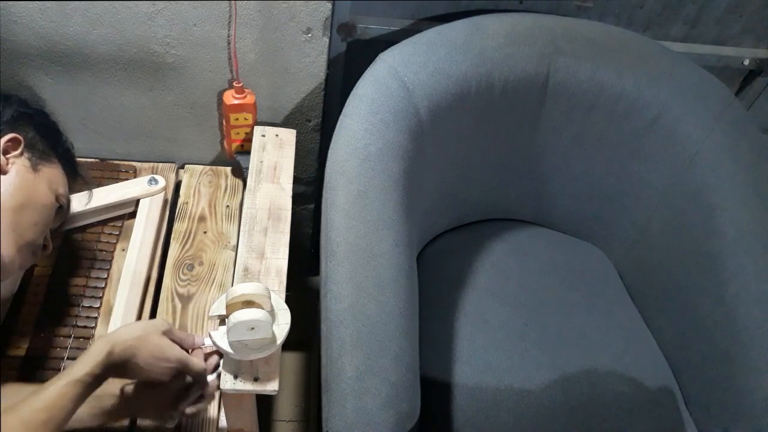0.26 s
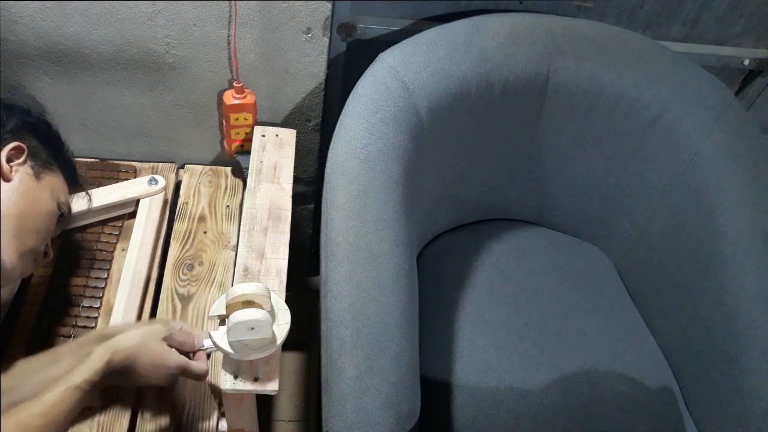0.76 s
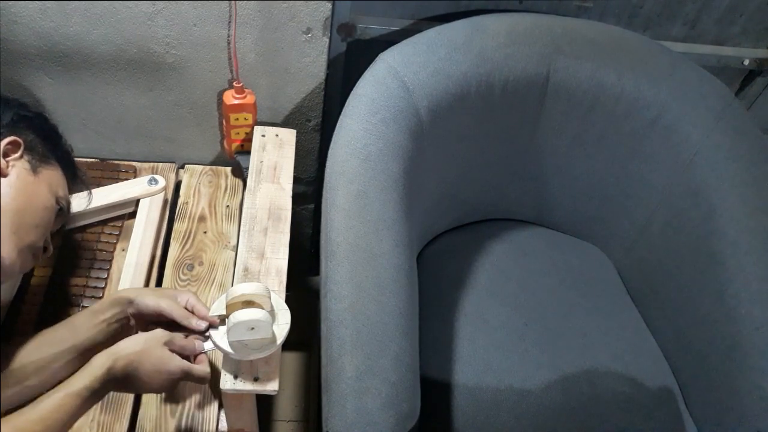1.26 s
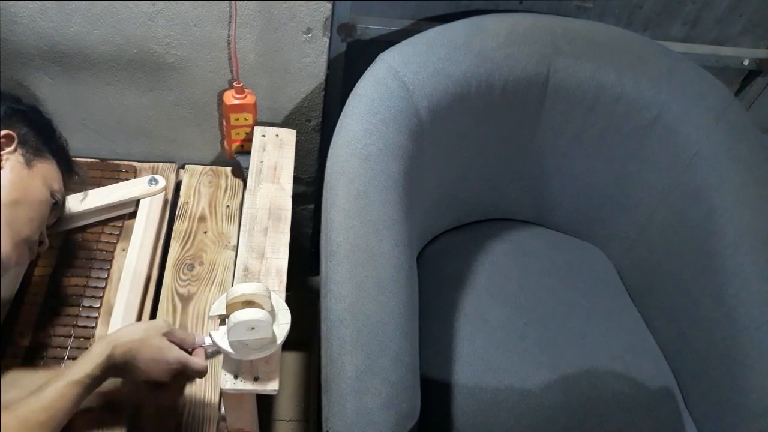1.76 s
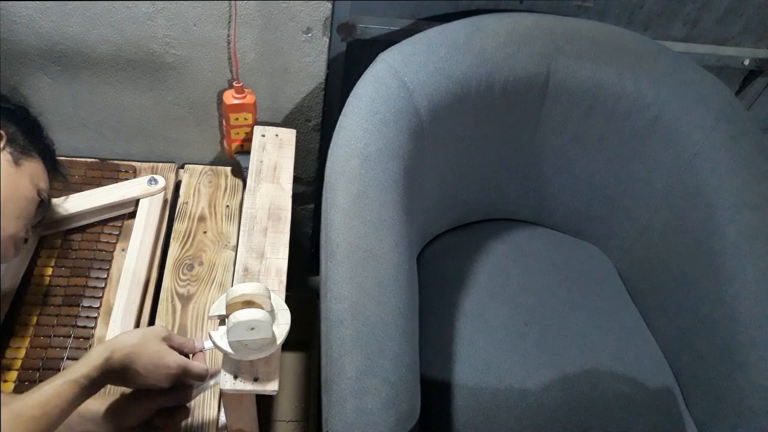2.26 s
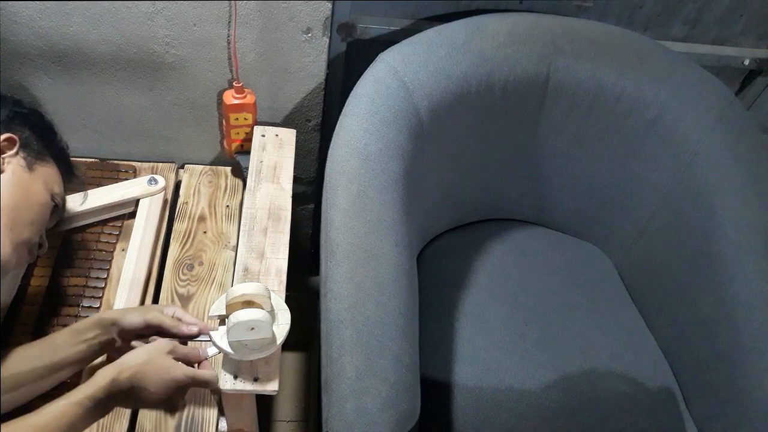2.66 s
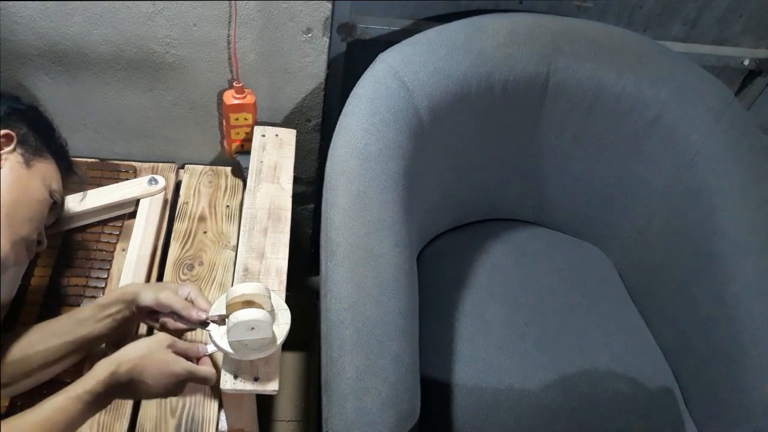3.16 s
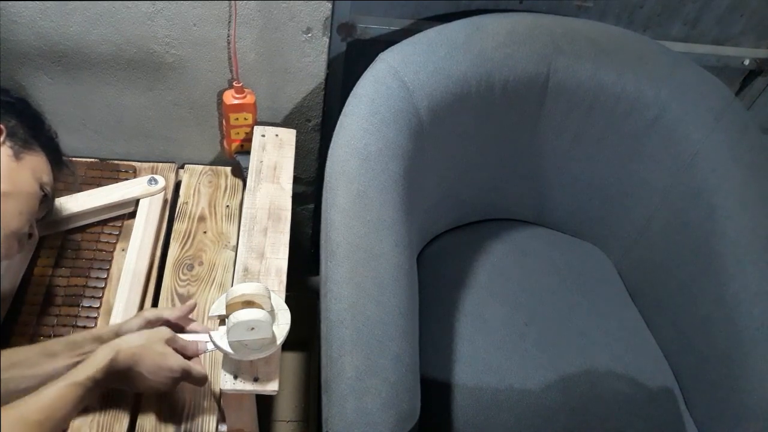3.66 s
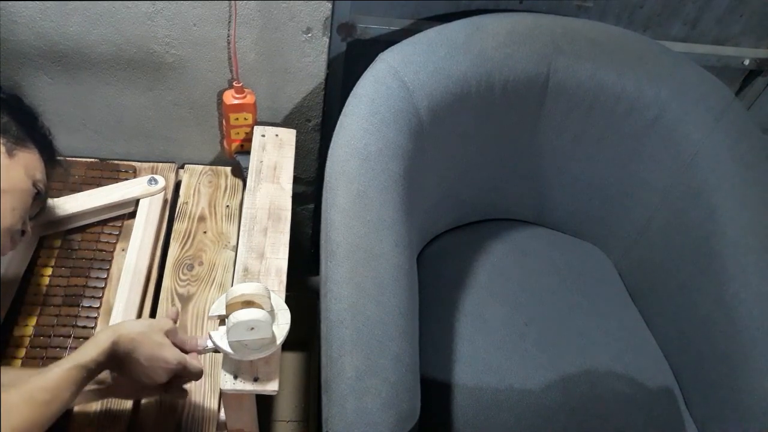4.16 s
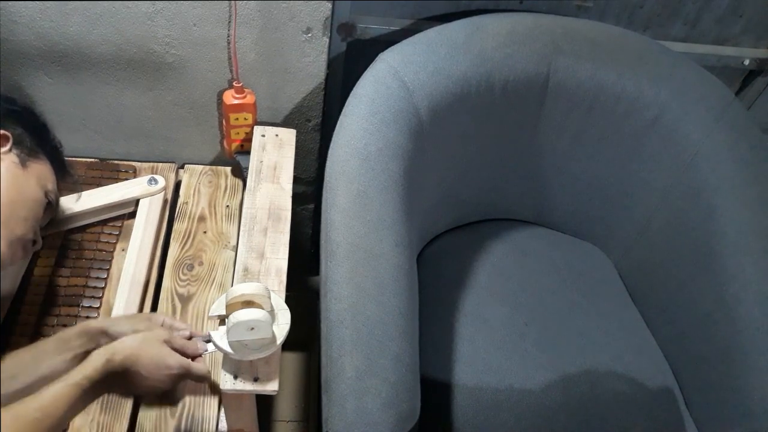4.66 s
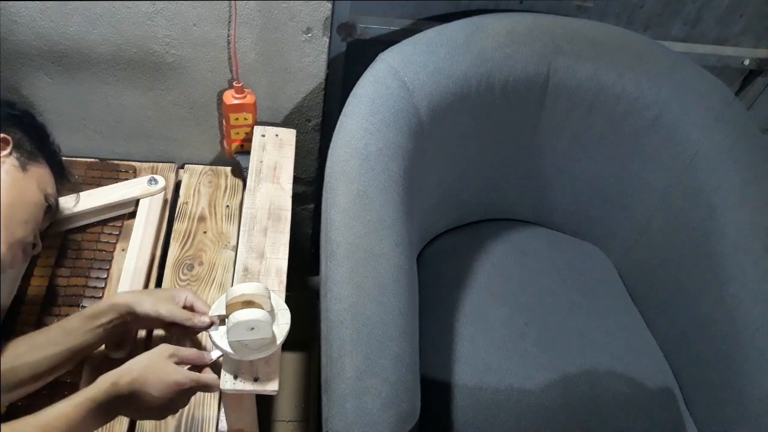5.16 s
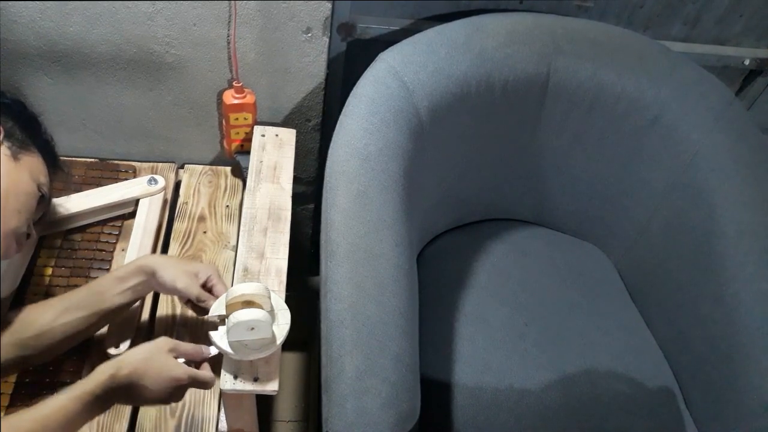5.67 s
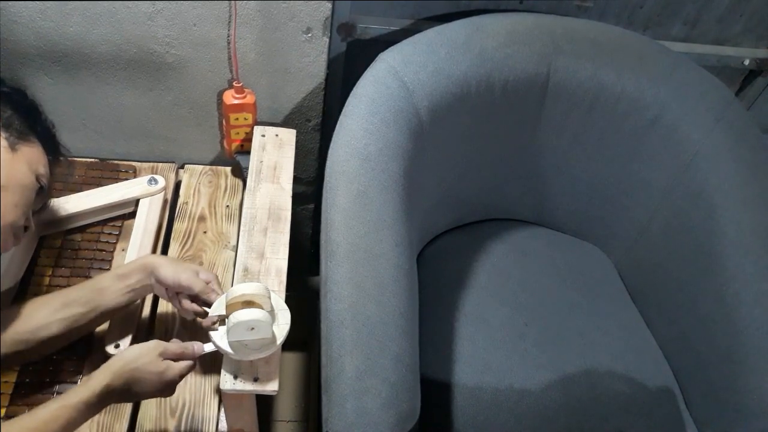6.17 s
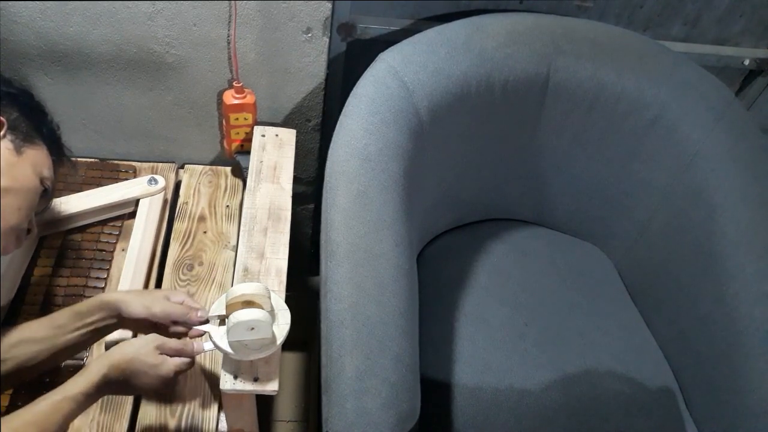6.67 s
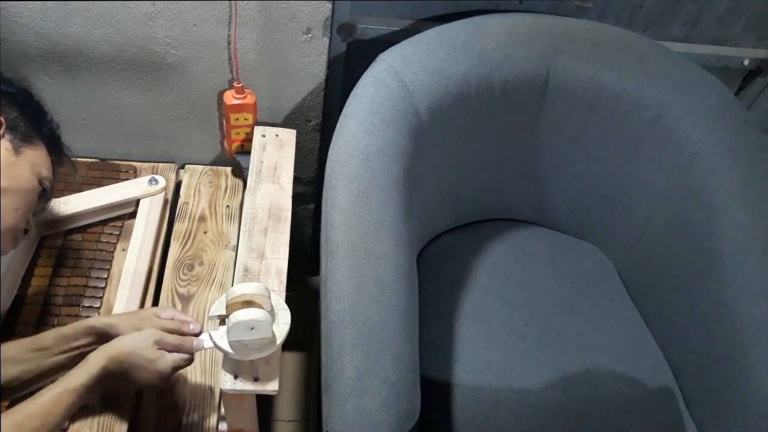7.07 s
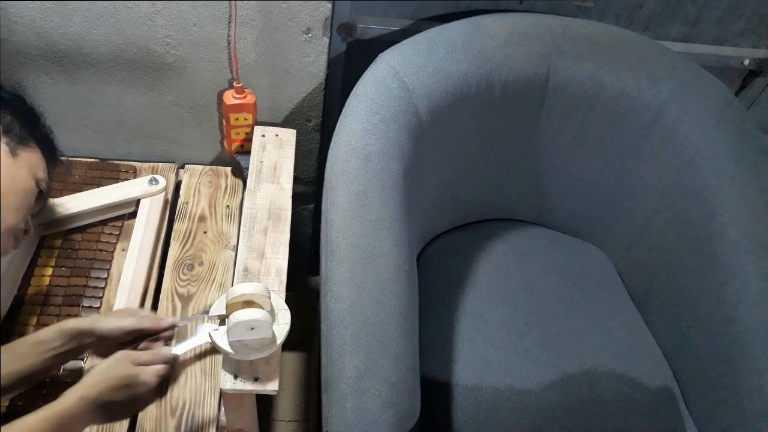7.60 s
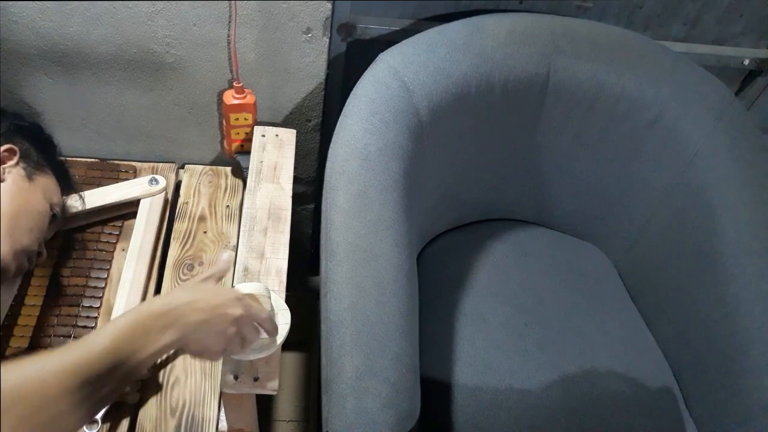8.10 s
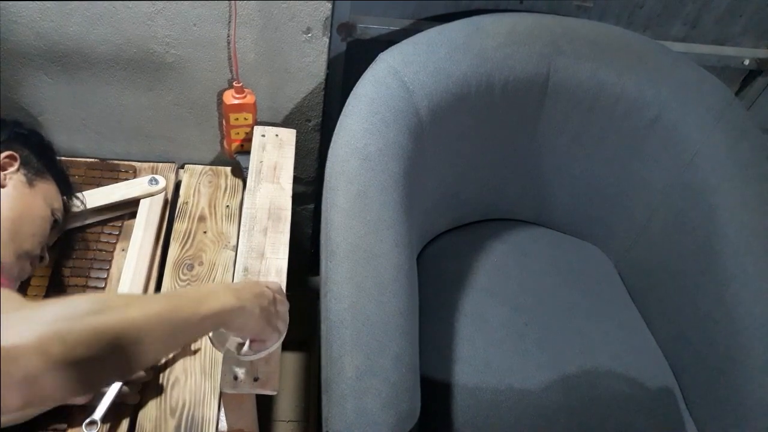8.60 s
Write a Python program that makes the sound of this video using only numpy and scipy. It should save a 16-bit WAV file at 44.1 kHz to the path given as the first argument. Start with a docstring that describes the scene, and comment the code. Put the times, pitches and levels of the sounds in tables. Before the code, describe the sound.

A close microphone hears wrenches working a bolt in a wooden frame inside a small, hard-walled shed. Faint insects rasp and chirp outside over low, far traffic and an engine drone that swells at about 1.2-2.3 and 2.6-3.7 s. Light taps come at 0.4, then a clink at 0.9 and a quick cluster of knocks and clinks from 1.0 to 1.4. A small scrape and tap follow near 2.1, a strong steel clink at 2.6 and a hard knock at 2.9. After a lull, a short scrape and taps run from 4.2 to 4.7, then brisk knocks and a ringing clink at 4.9-5.1. A growing rasp ends in the loudest knock at 5.45, with faint rubbing afterward. It stays quiet until a scraping rattle at 7.3-7.5, bright, higher wrench clinks at 7.75-7.85, and soft scuffing from 8.25 until almost the end. Echoes are short and hard.

```python
"""Two steel wrenches work a bolt in a wooden frame, in a hard-walled shed, heard by one microphone.
Knocks are chattering contact noise over ringing wood modes; clinks add the modes of a wrench.
Scrapes are uneven slips through a broad resonance, and sparse dying echoes answer all the bench work.
Outside, insects sing as narrow-band noise over far traffic, an engine's low tones and quiet air noise."""
import sys
import numpy as np
from scipy import signal
from scipy.fft import rfft, irfft
from scipy.io import wavfile
from scipy.ndimage import uniform_filter1d

SR = 44100
rng = np.random.default_rng(int(sys.argv[2]) if len(sys.argv) > 2 else 0)


def unload_audio(sound):
    """Save the sound as a 16-bit wav file, at the path given as the first command line argument."""
    columns = np.transpose(np.atleast_2d(sound))
    # keep every value between -1 and 1, then stretch to whole-number steps
    steps = np.round(np.clip(columns, -1, 1) * 32767)
    wavfile.write(sys.argv[1], SR, steps.astype(np.int16))


N = 389835  # length of the scene in samples


def gain_of(db):
    """Decibels to gain."""
    return 10 ** (np.asarray(db) / 20)


def evened(x):
    """Scales to rms 1."""
    return x / np.sqrt(np.mean(x ** 2) + 1e-20)


def read(points, hz):
    """Reads a table of (hz, value) on a log-frequency axis."""
    point_hz, value = np.transpose(points)
    return np.interp(np.log(hz + 1), np.log(point_hz + 1), value)


def follow(rows, t):
    """Joins the rows of each curve over time by straight lines."""
    s, *columns = np.transpose(rows)
    return [np.interp(t, s, column) for column in columns]


def add(mix, start_s, sound):
    """Mixes a sound in at start_s, cut at the end of the mix."""
    part = mix[round(start_s * SR):][:len(sound)]
    part += sound[:len(part)]


def smooth_noise(count, size):
    """A slow random curve of rms 1: white noise averaged over size samples."""
    return evened(uniform_filter1d(rng.standard_normal(count), size=size))


def highpass(x, cutoff_hz):
    """Removes what lies below cutoff_hz at 12 dB per octave."""
    return signal.sosfilt(signal.butter(2, cutoff_hz, "high", fs=SR, output="sos"), x)


def resonate(x, hz, width_hz):
    """Shifts the frequency hz (fixed or moving) to zero, smooths, shifts back: a resonance of gain 1."""
    turn = np.exp(2j * np.pi * np.cumsum(hz * np.ones(len(x))) / SR)
    pole = np.exp(-np.pi * width_hz / SR)
    smoothed = signal.lfilter([1 - pole], [1, -pole], x / turn + 1e-18)
    return 2 * (turn * smoothed).real


def noise(spectrum, patchy_db):
    """Noise of rms 1 from random short-time spectra, with patches that drift in time and frequency."""
    frames, hz = N // 256 + 5, np.fft.rfftfreq(1024, 1 / SR)
    real, imag, patches = rng.standard_normal((frames, 513, 3)).T
    patches = uniform_filter1d(patches, size=12, axis=0)  # along frequency
    patches = evened(uniform_filter1d(patches, size=14, axis=1))  # along time
    level_db = read(spectrum, hz)[:, None] + patchy_db * patches
    z = (real + 1j * imag) * gain_of(level_db)
    return evened(signal.istft(z, nperseg=1024, noverlap=768)[1][:N])


# spectrum of the quiet air around the microphone: pitch_hz, relative level_db (per Hz)
AIR_SPECTRUM = [(41, -34), (70, -3.5), (136, -3.5), (230, -7), (435, -12), (864, -25), (2410, -50),
                (3180, -38), (3730, -21), (4680, -25.5), (7230, -27.5), (10200, -26.5), (15000, -31),
                (16400, -59)]
AIR_DB = -57.5


def quiet_air():
    """The quiet background: faintly patchy noise at a steady overall level."""
    return gain_of(AIR_DB) * noise(AIR_SPECTRUM, 1.8)


def wavering(hz, drift_hz):
    """A tone of rms 1 whose pitch drifts slowly."""
    drift = smooth_noise(N, 9000)
    return 2 ** .5 * np.sin(2 * np.pi * (np.cumsum(hz + drift_hz * drift) / SR + rng.random()))


# spectrum of the far traffic: pitch_hz, relative level_db (per Hz)
TRAFFIC_SPECTRUM = [(62, -40), (75, -16), (100, -15.5), (120, -4.5), (190, -11.5), (409, -19), (900, -20.5),
                    (1500, -36.5), (2500, -44), (5500, -100)]
# loudness of the far road: time_s, traffic_db, throb_db (the engine's low tones)
ROAD_LEVELS = [(0.0, -57.5, -64), (0.8, -61, -62.5), (1.2, -48, -56), (1.6, -47.5, -58.5), (2.4, -57, -53),
               (2.75, -47.5, -59.5), (3.5, -57.5, -58), (4.6, -54.5, -60), (5.1, -54, -67),
               (5.55, -56.5, -58), (5.9, -57, -74.5), (6.4, -69, -73), (6.65, -65, -64), (7.5, -53.5, -58),
               (8.2, -52.5, -72), (8.6, -51.5, -63), (8.84, -52, -64)]
# spells of the engine's drone, added to its faint idle: start_s, length_s, level_db
DRONE_SPELLS = [(1.194, 1.1, -53), (2.62, 1.07, -57.5), (4.847, 0.38, -52), (8.298, 0.7, -70)]
IDLE_DB, DRONE_FADE_S = -63, 0.081
DRONE_HZ, THROB_HZ = 137.3, (41.7, 56.3)


def road():
    """Far traffic swells; an engine's drone comes and goes over two beating low tones."""
    t = np.arange(N) / SR
    traffic_db, throb_db = follow(ROAD_LEVELS, t)
    traffic = gain_of(traffic_db) * noise(TRAFFIC_SPECTRUM, 2.4)
    throb = gain_of(throb_db) * evened(sum(wavering(hz, 1.5) for hz in THROB_HZ))
    drone_gain = gain_of(IDLE_DB)
    for start_s, length_s, level_db in DRONE_SPELLS:
        to_edge_s = np.minimum(t - start_s, start_s + length_s - t)
        drone_gain = drone_gain + gain_of(level_db) * np.clip(to_edge_s / DRONE_FADE_S, 0, 1)
    return traffic + drone_gain * wavering(DRONE_HZ, .6) + throb


def whistle(hz, width_hz):
    """Noise of rms 1 through a steep resonance."""
    return evened(resonate(resonate(rng.standard_normal(N), hz, width_hz), hz, width_hz))


# loudness of the two insects outside: time_s, rasp_db, singer_db
INSECT_LEVELS = [(0.0, -65.5, -63), (0.7, -60, -73), (1.5, -60.5, -69), (2.1, -63, -71.5),
                 (2.6, -64.5, -56), (3.3, -63, -68), (4.1, -62, -74), (4.8, -64.5, -89), (5.5, -69, -66),
                 (5.8, -83, -67.5), (6.3, -83.5, -66.5), (6.95, -63.5, -63), (7.4, -64.5, -62),
                 (8.1, -68, -60), (8.84, -59.5, -78)]
RASP_HZ, CLIMB_HZ_PER_S = 3231, 22  # the rasp's first pitch and its steady rise
WANDER_HZ, WOBBLE_HZ = 60.2, 90  # rms of its slow and quick pitch changes
RASP_WIDTH_HZ = 330  # of each resonance stage


def insects():
    """A wandering rasp and a steadier singer in short chirps, each with a higher partial, and a thin whine."""
    t = np.arange(N) / SR
    rasp_db, singer_db = follow(INSECT_LEVELS, t)
    hz = RASP_HZ + CLIMB_HZ_PER_S * t
    hz = hz + WANDER_HZ * smooth_noise(N, 12000) + WOBBLE_HZ * smooth_noise(N, 2500)
    rasp_db = rasp_db + 3.3 * smooth_noise(N, 4000)  # it flickers
    rasp = whistle(hz, RASP_WIDTH_HZ) + gain_of(-5.5) * whistle(2 * hz, RASP_WIDTH_HZ)
    # about four swells a second, at an uneven pace, never quite silent between
    chirps = .6 + np.sin(2 * np.pi * 4.1 * t + 1.5 * np.sin(2 * np.pi * 1.2 * t))
    chirps = np.clip(chirps, .4, 1)
    singer = chirps * (whistle(3760, 150) + gain_of(-6) * whistle(7250, 350))
    # a shallow flutter around 27 Hz on both
    flutter = 1 + 0.078 * np.sin(2 * np.pi * 27 * t + 3.5 * np.sin(2 * np.pi * 3.0 * t))
    whine = gain_of(-88) * whistle(8700, 60)
    return flutter * (gain_of(rasp_db) * rasp + gain_of(singer_db) * singer) + whine


# decay of the echoes in the hard-walled shed: pitch_hz, t60_s
SHED_DECAY = [(150, .36), (600, 0.49), (2000, 0.37), (5000, 0.39), (10000, 0.3), (16000, 0.29)]


def shed(x):
    """Strong near reflections, then sparse taps of random sign dying band by band."""
    size = SR // 2
    taps = np.zeros(size)
    at = np.arange(100, size - 12, 12)
    taps[at + rng.integers(0, 12, len(at))] = rng.choice([-1., 1.], len(at))
    t = np.arange(size) / SR
    hz, frame_s, z = signal.stft(taps, SR, nperseg=256)
    decay_db = -60 * frame_s / read(SHED_DECAY, hz)[:, None]
    tail = signal.istft(z * gain_of(decay_db), SR, nperseg=256)[1][:size]
    tail *= 1 + 1.71 / (1 + (t / .007) ** 3)  # bench, wall and floor answer first
    return signal.fftconvolve(x, tail / np.linalg.norm(tail))[:N]


# steel and hands dragged over wood: start_s, length_s, first_db, last_db, centre_hz
SCRAPES_ON_WOOD = [(2.088, 0.053, -71, -46, 2700), (4.399, 0.057, -77, -32, 2680),
                   (5.391, 0.086, -59.5, -18.5, 2680), (5.702, 0.38, -58, -69, 790),
                   (7.282, 0.15, -62, -44.5, 2700), (7.407, 0.0617, -50, -25, 2700),
                   (8.255, 0.15, -49.5, -59.5, 795), (8.256, 0.41, -51.5, -64, 2970),
                   (8.618, 0.26, -51.5, -76, 3000), (8.718, 0.119, -54, -47.5, 288)]


def scrape(length_s, first_db, last_db, centre_hz):
    """Dense uneven slips, coloured by a broad resonance, growing or dying evenly."""
    db = np.linspace(first_db, last_db, round(length_s * SR))
    db = db + 2.5 * smooth_noise(len(db), 900)  # the grip falters
    slips = rng.standard_normal(len(db)) * gain_of(2.5 * rng.exponential(1, len(db)))
    body = resonate(resonate(slips, centre_hz, 1.2 * centre_hz), centre_hz, 2.0 * centre_hz)
    return gain_of(db) * evened(body) * signal.windows.tukey(len(db), .15)


def ring(hz, modes, spread_db):
    """One blow on a body; where it lands decides how strongly each mode answers."""
    t = np.arange(SR // 6)[:, None] / SR
    level_db, t60_s = np.transpose(modes)
    place, phase = rng.standard_normal(len(modes)), rng.random(len(modes))
    decaying_db = level_db + spread_db * place - 60 * t / t60_s
    tones = gain_of(decaying_db) * np.sin(2 * np.pi * (np.array(hz) * t + phase))
    return tones.sum(axis=1) * np.minimum(t[:, 0] / 0.00059, 1)  # 0.59 ms onset


# steel against wood: start_s, crack_db, tick_db (bright), frame_db, bench_db (all relative)
KNOCKS_ON_WOOD = [(0.402, -30, -60, -37, -39), (0.435, -32, -54, -48, -37.5), (1.016, -41, -72, -43, -53),
                  (1.217, -33.5, -70, -20.5, -33), (1.237, -23.5, -28, -40, -30),
                  (1.255, -23, -57, -37, -46), (1.335, -21, -40.5, -52, -42), (1.352, -23, -60, -22, -35),
                  (2.114, -57, -60, -57, -39), (2.154, -35.5, -49, -29.5, -36.5),
                  (2.519, -47, -69, -72, -55.5), (2.938, -19.5, -25, -21, -31.5),
                  (3.218, -61, -57, -58, -52), (4.453, -30.5, -44, -39, -38), (4.652, -42.5, -52, -59, -60),
                  (4.6725, -27.5, -64.5, -22, -33), (4.9005, -21.5, -81, -32.5, -37),
                  (5.0415, -25, -29, -28, -39.5), (5.0845, -26, -37.5, -26.5, -33),
                  (5.35, -51, -74.5, -57.5, -50.5), (5.421, -40.5, -56, -41.5, -45),
                  (5.454, -13, -17, -14, -27.5), (5.95, -68, -60.5, -60.5, -73),
                  (7.299, -58, -77, -49.5, -69), (7.393, -48, -64, -44, -46),
                  (7.41, -30.5, -48, -43, -45.5), (7.437, -45, -61, -36, -40.5),
                  (7.455, -28, -50, -35, -49), (7.4655, -31.5, -53, -34, -37),
                  (8.256, -49.5, -44.5, -57, -47)]
# modes of the wooden frame: pitch_hz
FRAME_HZ = [904, 1082, 1260, 1490, 1560, 1955, 2200]
# the same modes, a row each: relative level_db, t60_s
FRAME_MODES = [(-4, .045), (-6, .025), (-1.5, .055), (-7, .03), (-1, .07), (1, .045), (-4, .025)]
# modes of the bench: pitch_hz
BENCH_MODE_HZ = [194, 290, 430, 620, 770]
# the same modes, a row each: relative level_db, t60_s
BENCH_MODES = [(-1.5, 0.16), (-1.5, 0.028), (6, 0.037), (2, 0.021), (4, 0.039)]
KNOCK_HZ, KNOCK_MS = 2653, 2.6  # centre of the crack, time scale of the contact


def knock(crack_db, tick_db, frame_db, bench_db, crack_hz, contact_ms):
    """A few milliseconds of chattering contact crack and tick while the wood rings."""
    u = 1000 * np.arange(2048) / SR / max(contact_ms, .1)  # time in contact lengths
    chatter = rfft(rng.standard_normal(len(u)) * np.exp(-u))
    chatter = irfft(chatter / abs(chatter) ** 0.26)  # many tiny contacts even out the colour
    chatter *= np.exp(-.3 * u) * np.minimum(2.3 * u, 1)
    crack = chatter
    for width_hz in (3000, 4000, 7000):
        crack = resonate(crack, crack_hz, width_hz)
    crack = highpass(crack, 0.27 * crack_hz)  # small parts give no bass
    tick = highpass(resonate(chatter, 5800, 5200), 4200)
    out = gain_of(frame_db) * ring(FRAME_HZ, FRAME_MODES, 1.5)
    out += gain_of(bench_db) * ring(BENCH_MODE_HZ, BENCH_MODES, 1.8)
    add(out, 0, 26 * gain_of(crack_db) * crack / np.linalg.norm(crack))
    add(out, 0, 28 * gain_of(tick_db) * tick / np.linalg.norm(tick))
    return out


# steel against steel: start_s, crack_db, tick_db, frame_db, bench_db, wrench (which rings), ring_db
CLINKS_OF_STEEL = [(0.369, -39, -48, -45.5, -48, "long", -30.5),
                   (0.8915, -27.5, -26, -27, -34, "long", -16.5),
                   (1.027, -22.5, -30, -38, -45, "long", -17),
                   (1.1395, -21, -19.5, -28, -40, "long", -12.5),
                   (2.6158, -16, -19.5, -18.5, -27, "long", -12), (2.927, -35, -25, -30, -58, "long", -17),
                   (4.196, -32, -31.5, -31, -34, "long", -33.5),
                   (4.991, -27, -25.5, -32, -40.5, "long", -9.5), (7.746, -72, -29, -52, -55, "short", -11),
                   (7.7775, -42, -25, -63, -68, "short", -19), (7.8, -57, -38, -70, -53.5, "short", -24),
                   (7.841, -53, -49, -65, -67, "short", -31),
                   (8.041, -36.5, -39, -38.5, -37.5, "short", -46)]
# modes of the long wrench: pitch_hz
LONG_WRENCH_HZ = [2200, 2700, 3570, 4440, 4690, 5300, 6650, 7950, 8840, 10250, 12070]
# the same modes, damped by the grip, a row each: relative level_db, t60_s
LONG_WRENCH_MODES = [(-6, .016), (-3, .02), (-6, .015), (-3, .02), (-4, .018), (-2, .012), (-10, .015),
                     (0, .028), (-8, .015), (-10, .015), (-2, .025)]
# modes of the short wrench: pitch_hz
SHORT_WRENCH_HZ = [2310, 2775, 4124, 4720, 5110, 5650, 6255, 6800, 7250, 7850, 8030, 8880, 9770, 10200,
                   13000, 14920]
# the same modes, a row each: relative level_db, t60_s
SHORT_WRENCH_MODES = [(-20, .03), (-20, .03), (-16, .025), (-10, .05), (-10, .02), (-12, .012), (-10, .015),
                      (-8, .015), (-7, .02), (-4, .03), (0, .055), (-14, .015), (-8, .02), (-12, .03),
                      (-12, .06), (-15, .05)]
LONG_CRACK_HZ, SHORT_CRACK_HZ, CLINK_MS = 3550, 4560, 3.26  # steel cracks higher than wood


def clink(crack_db, tick_db, frame_db, bench_db, wrench, ring_db):
    """A knock that also rings the modes of one wrench."""
    if wrench == "long":
        crack_hz, steel = LONG_CRACK_HZ, ring(LONG_WRENCH_HZ, LONG_WRENCH_MODES, 2.5)
    else:
        crack_hz, steel = SHORT_CRACK_HZ, ring(SHORT_WRENCH_HZ, SHORT_WRENCH_MODES, 1.4)
    contact = knock(crack_db, tick_db, frame_db, bench_db, crack_hz, CLINK_MS)
    return contact + gain_of(ring_db) * steel


def bench_work():
    """Knocks, clinks and scrapes, with sparse dying echoes."""
    groups = np.zeros((6, N))  # blows take turns through six random echo tails; scrapes all use the first
    for k, (start_s, *blow) in enumerate(KNOCKS_ON_WOOD):
        add(groups[k % len(groups)], start_s, knock(*blow, KNOCK_HZ, KNOCK_MS))
    for k, (start_s, *blow) in enumerate(CLINKS_OF_STEEL):
        add(groups[k % len(groups)], start_s, clink(*blow))
    for start_s, *stroke in SCRAPES_ON_WOOD:
        add(groups[0], start_s, scrape(*stroke))
    work = sum(gain_of(-5.5) * group + shed(group) for group in groups)
    return highpass(work, 130)  # a small frame moves no deep bass


def scene():
    """Bench sounds with their echoes over the outdoors, the same in both channels."""
    mono = quiet_air() + road() + insects() + bench_work()
    return np.array([mono, mono])


# response of the microphone capsule: pitch_hz, level_db
CAPSULE_RESPONSE = [(60, 1.5), (1000, -1), (5000, 1), (8800, -2), (9600, -14), (12000, -12.5),
                    (16000, -9.5)]
# level of the hiss above 11 kHz: time_s, level_db
TREBLE_HISS = [(0.0, -72), (1.5, -68.5), (5.4, -72), (6.0, -78), (7.0, -72), (8.84, -66)]
# how far the channels differ: pitch_hz, side_minus_mid_db
CHANNEL_DIFFERENCE = [(60, -25), (240, -25), (950, -30), (3770, -26), (9000, -24), (15000, -17)]
# spectrum of the hiss that differs between channels: pitch_hz, relative level_db (per Hz)
SIDE_HISS_SPECTRUM = [(18, -47), (30, -15), (140, -16), (2420, -24), (3400, -17.5), (4780, -16),
                      (15500, -31.5)]
EDGE_HZ = 16050  # upper band limit


def record(dry):
    """One capsule, dull above 9 kHz, feeds both channels, which differ very slightly; then the band limit."""
    hz = np.linspace(0, SR / 2, 257)
    # the minimum-phase step halves the decibels, so they are doubled first
    doubled = signal.firwin2(511, hz, gain_of(2 * read(CAPSULE_RESPONSE, hz)), fs=SR)
    capsule = signal.minimum_phase(doubled)
    hiss = evened(highpass(rng.standard_normal(N), 11000))
    hiss_db = follow(TREBLE_HISS, np.arange(N) / SR)[0]
    mid = signal.oaconvolve(dry[0], capsule)[:N] + gain_of(hiss_db) * hiss
    # the side signal is the mid with random phases, far quieter, and a hiss of its own
    side_hz, _, z = signal.stft(mid, SR, nperseg=1024)
    random_phase = np.exp(2j * np.pi * rng.random(z.shape))
    scattered = z * gain_of(read(CHANNEL_DIFFERENCE, side_hz))[:, None] * random_phase
    side = signal.istft(scattered, nperseg=1024)[1][:N]
    side = side + gain_of(-72.5) * noise(SIDE_HISS_SPECTRUM, 1.5)
    both = np.array([mid + side, mid - side])
    band_limit = signal.firwin(161, EDGE_HZ, window=("kaiser", 9), fs=SR)
    return signal.oaconvolve(both, band_limit[None], "same")


dry = scene()
out = record(dry)
unload_audio(out)
```